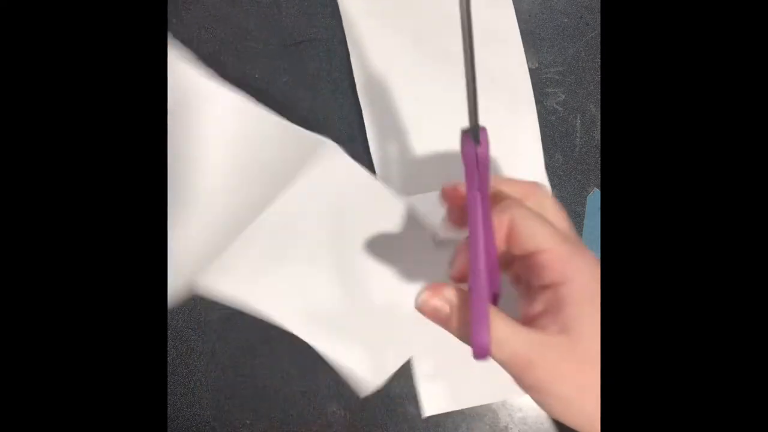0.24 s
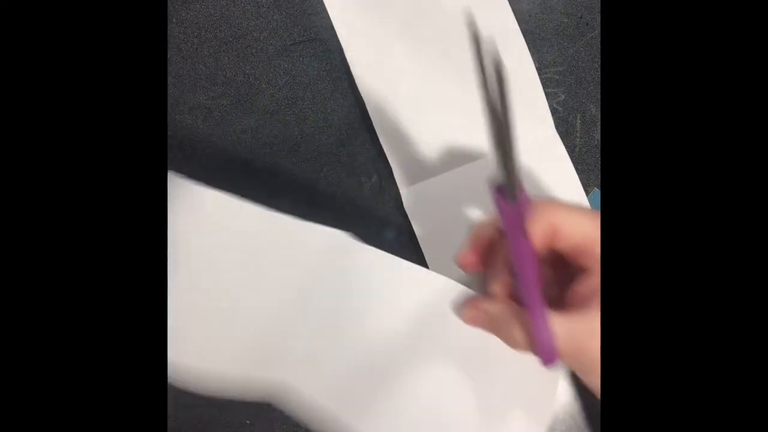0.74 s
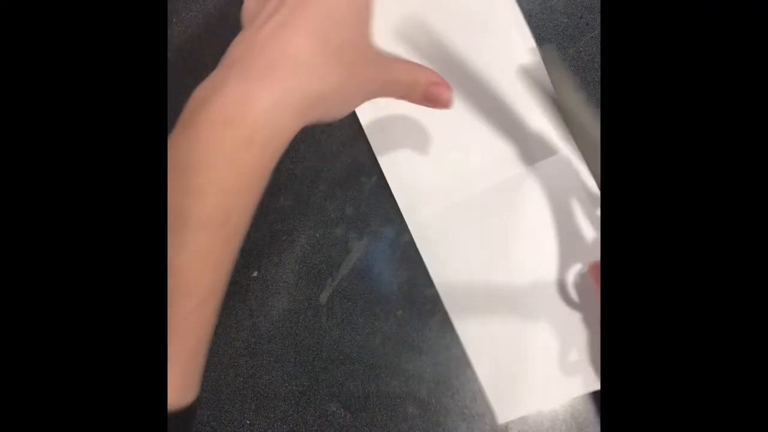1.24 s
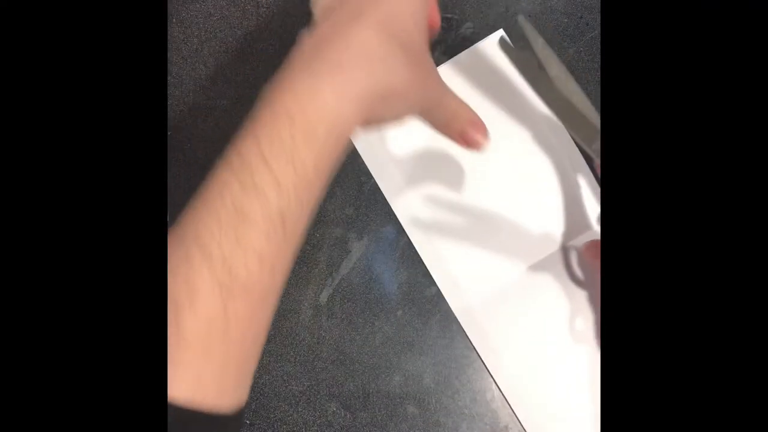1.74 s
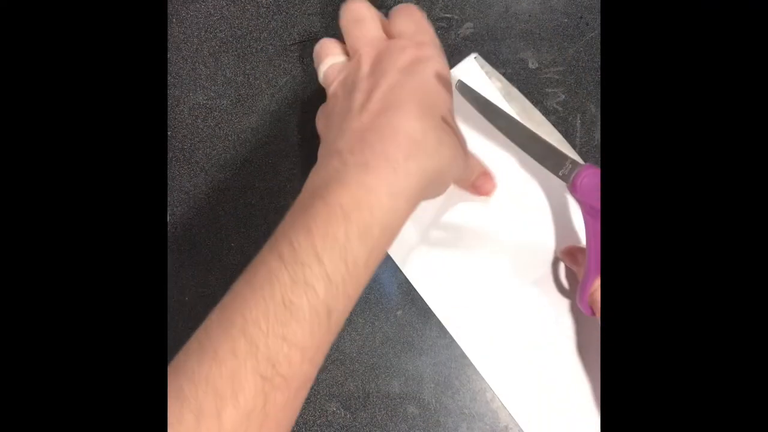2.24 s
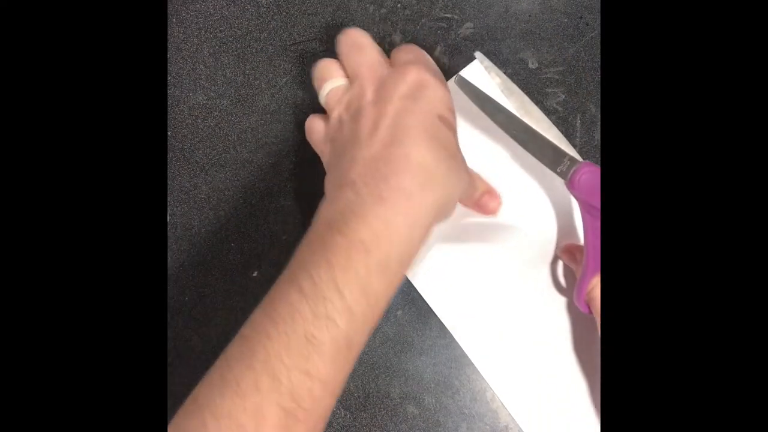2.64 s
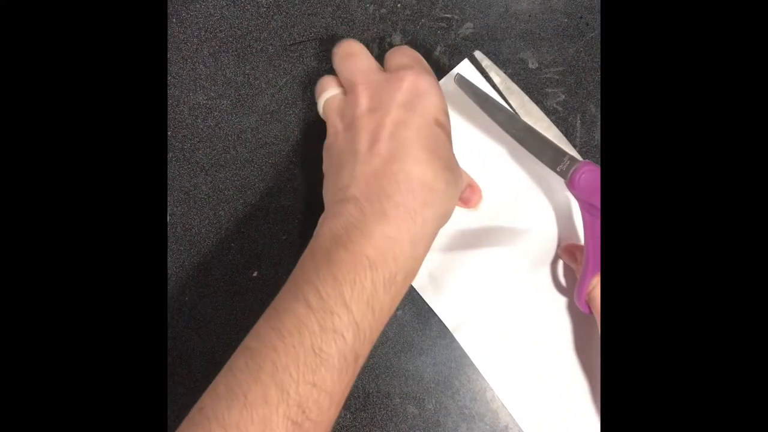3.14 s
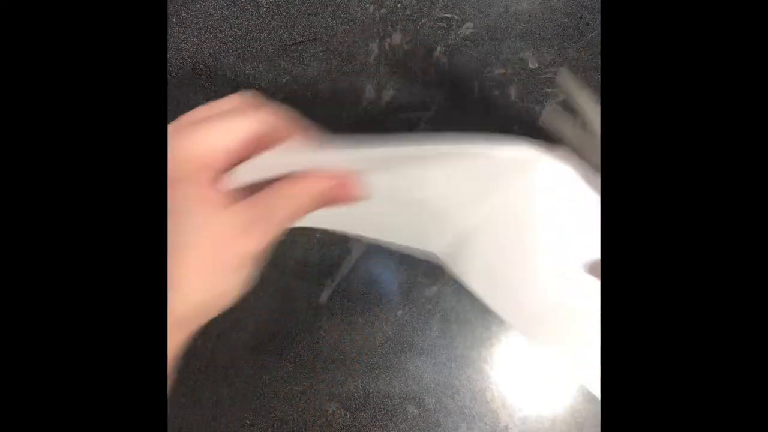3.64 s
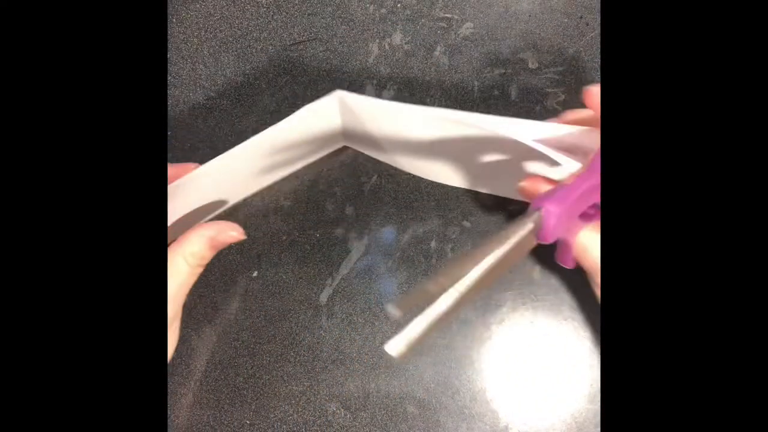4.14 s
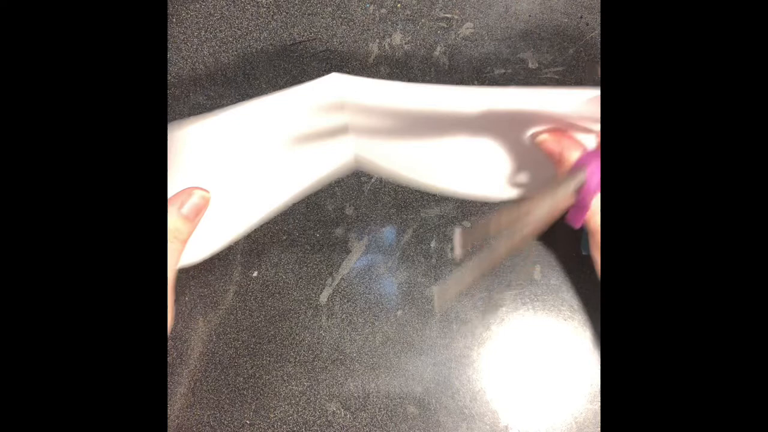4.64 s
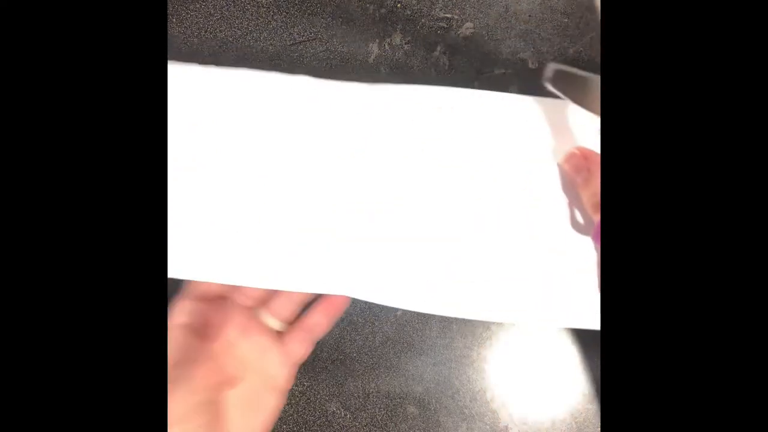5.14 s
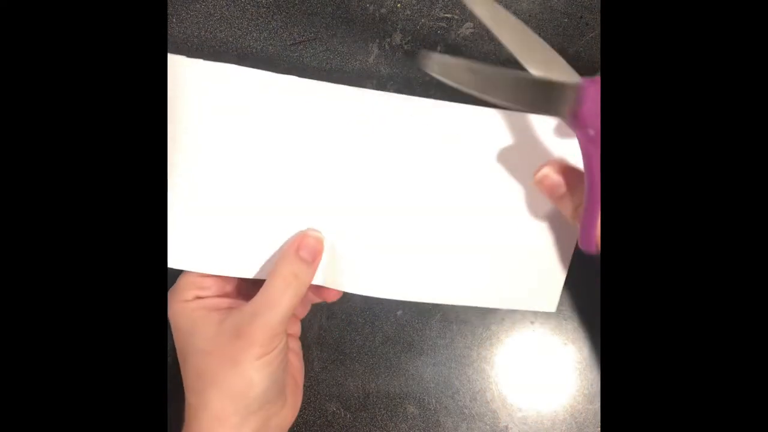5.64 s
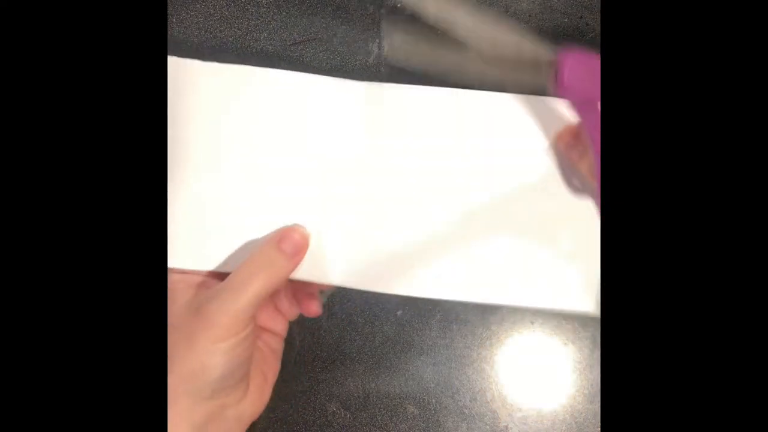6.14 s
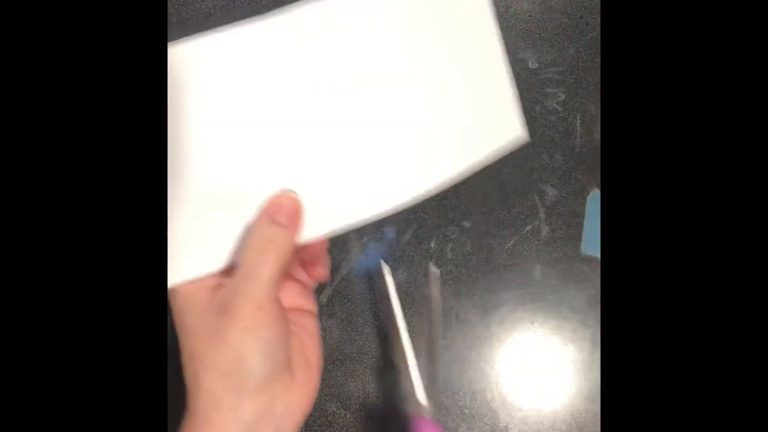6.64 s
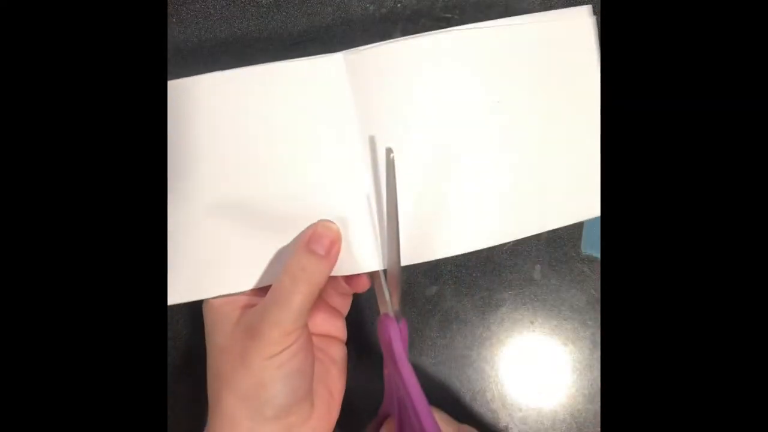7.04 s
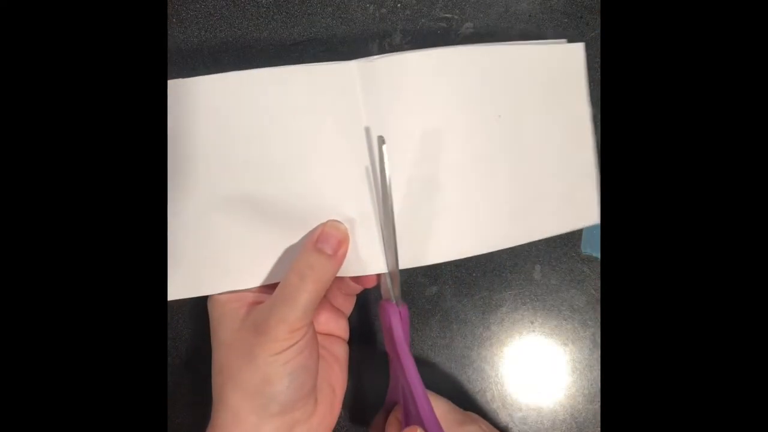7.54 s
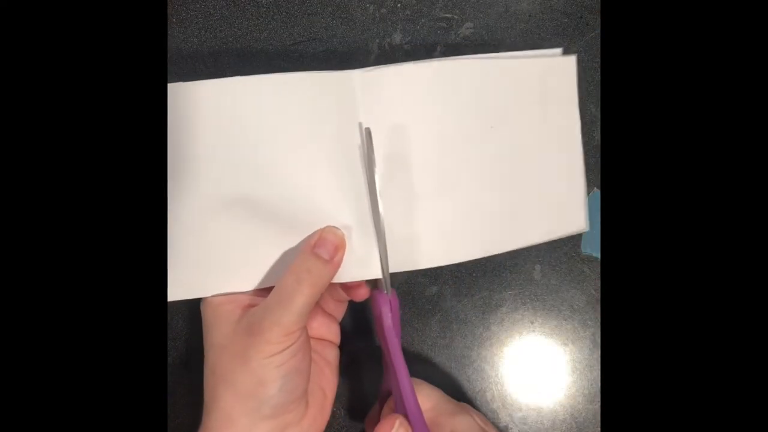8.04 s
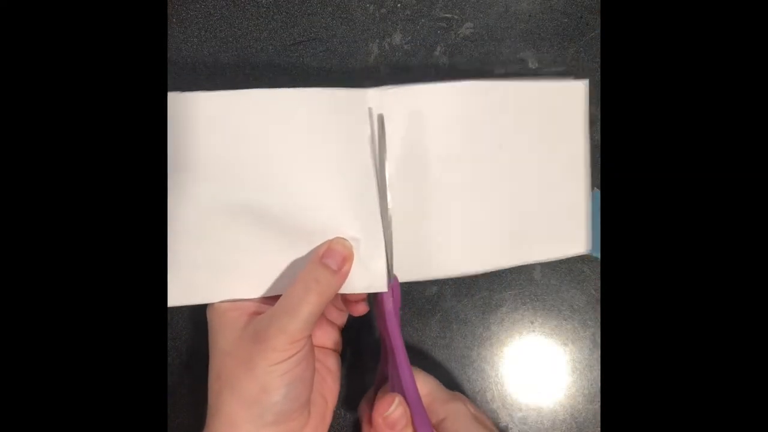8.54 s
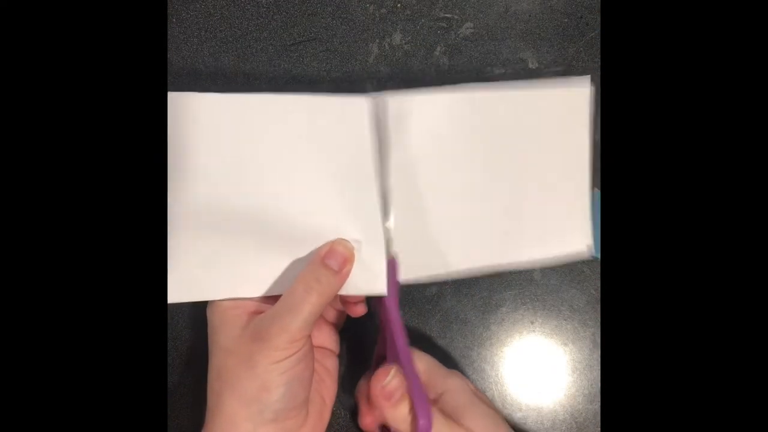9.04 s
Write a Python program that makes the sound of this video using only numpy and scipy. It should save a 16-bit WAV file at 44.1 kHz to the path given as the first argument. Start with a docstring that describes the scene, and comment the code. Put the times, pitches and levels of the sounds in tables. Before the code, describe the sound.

Hands fold a sheet of paper with light snapping creases before scissors snip through it with quick, gritty strokes in a small room.

```python
"""A sheet of paper is turned and folded by hand over a countertop, then cut with short scissor strokes.
Tiny buckles and tearing fibres click into the sheet's resonances, voiced in four bands: crackle, body,
thin edge and low flap. The sheet flops onto the counter and a finger squeaks along its edge.
Underneath, a fan, mains hum and a buzzing whine fill the small room."""
import sys
import numpy as np
from scipy import signal
from scipy.fft import rfft, irfft
from scipy.io import wavfile
from scipy.ndimage import uniform_filter1d

SR = 44100
rng = np.random.default_rng(int(sys.argv[2]) if len(sys.argv) > 2 else 0)


def master(y):
    """Save y as 16-bit WAV."""
    cut = np.clip(np.atleast_2d(y).T, -1, 1)
    pcm = np.round(cut * 32767)  # scale
    wavfile.write(sys.argv[1], SR, pcm.astype(np.int16))


N = 409226
T = np.arange(N) / SR

# tone of the fan's air: frequency_hz, relative_db
FAN_SPECTRUM = [(15, -53), (25, -13.5), (129, -0.5), (193, -13), (227, -10.5), (322, -18), (359, -10.5),
                (433, -23), (702, -14.5), (1490, -27), (1710, -25.5), (3430, -29.5), (5140, -32.5),
                (5730, -34.5), (15500, -44.5)]
# fader ride on the room tone: time_s, level_db, rumble_boost_db
ROOM_TONE_RIDE = [(0, -59.5, -1.5), (4.74, -61.5, -1), (4.79, -62.5, -4), (8.68, -61, -10),
                  (8.73, -59.5, -4.5), (9.28, -59, 1)]
# envelope of the finger squeak: time_s, level_db
SQUEAK_ENVELOPE = [(3.7, -100), (3.725, -60.5), (3.81, -69.5), (3.85, -92)]
# ring of the counter and the air under the sheet: pitch_hz, level_db, t60_s
COUNTER_MODES = [(166.3, 0, .16), (306, -2.5, 0.068), (455, -3, .06)]
# the sheet lands on the counter: start_s, level_db, upper_modes_db
LANDINGS = [(1.180, -46.5, 10), (1.199, -40.5, 0), (1.323, -50.5, 6.5), (1.343, -45, -3), (2.104, -46, 3),
            (2.536, -50, 0)]
# resonances of the loose sheet, by band: pitch_hz, nominal_width_hz, relative_db
LOOSE_MODES = {"crackle": [(1952, 280, 0), (2270, 192, 2.5), (2697, 300, 7.5), (3096, 110, -5)],
               "body": [(686, 138.2, -2.5), (946, 170, 0), (1235, 180, -11.5), (1464, 159, -4.5)],
               "edge": [(3700, 190, 2), (4700, 100, -4), (5240, 1600, -12.5)], "flap": [(196.5, 80, -3.5),
               (319, 72, -1.5), (520, 162, 2)]}
# resonances of the sheet pinched between the blades, same columns
PINCHED_MODES = {"crackle": [(1820, 280, -11), (2220, 150, -3.5), (2477, 140, 0), (2854, 247, -1.5)],
                 "body": [(772, 70, -3.5), (951, 142, 3), (1290, 120, -7), (1472, 77, -1), (1650, 76, -12)],
                 "edge": [(3680, 330, 2.5), (3964, 83, 7), (4670, 770, -6), (5810, 260, -7.5),
                 (6180, 620, -11)], "flap": [(388, 115, 2.5), (507, 25, -2), (652, 145, 1.5)]}
# bending waves bring the low resonances later, by band: delay_ms
BAND_DELAY_MS = {"crackle": 0, "body": 1.207, "edge": 0, "flap": 2.963}
# In the four cue lists below, body_db, edge_db and flap_db are offsets from crackle_db.
# the blades push through the paper: start_s, hold_s, crackle_db, body_db, edge_db, flap_db
BLADE_PUSHES = [(6.822, 0.11, -56, -1, -18, -12.5), (6.95, 0.087, -66, 8.5, -16.5, -6.5),
                (7.085, 0.048, -71, 13, -15, -1), (7.163, 0.06, -62.5, 4, -17.5, -9.5),
                (7.345, .065, -52, 1.5, -15.5, -21.5), (7.425, 0.22, -56.5, 5.5, -15, -11.5),
                (7.77, 0.094, -55, 4, -13, -6), (7.89, 0.13, -55.5, 4, -12, -7),
                (8.122, 0.09, -54, 7, -12, -6), (8.235, .11, -56.5, 5, -9, -5.5),
                (8.432, 0.082, -53, 9.5, -15, -1.5), (8.545, 0.091, -57.5, 8.5, -5.5, -0.5),
                (8.71, .10, -53, 6, -14, -1), (8.83, 0.039, -47.5, 8, -12, 0),
                (8.981, 0.077, -53.5, 7.5, -12.5, -3.5), (9.088, 0.021, -49.5, 5, -8, 2),
                (9.12, 0.036, -58, 6, -10, 4), (9.234, .05, -54, 6.5, -14, 5)]
# the blades catch and slip: start_s, crackle_db, body_db
BLADE_CATCHES = [(6.8243, -42, -4.5), (6.9166, -43, -14), (7.0852, -54.5, 11), (7.3536, -44, -2),
                 (7.379, -37, -6), (7.3915, -40.5, -9), (7.400, -39, -5), (7.4823, -38, -2),
                 (7.5656, -40.5, 8), (7.6384, -38.5, 4.5), (7.6758, -42, -1), (7.7736, -50, 3),
                 (7.9063, -39, -11), (7.9367, -36.5, -6), (7.9796, -38.5, -2), (7.9921, -35.5, -3.5),
                 (8.0186, -33, -1), (8.054, -33, -4.5), (8.1308, -35, 7), (8.1902, -39, 7),
                 (8.2327, -27.5, -7), (8.247, -33.5, 0), (8.262, -35.5, 0), (8.2855, -37, -1),
                 (8.3029, -42, 2), (8.3254, -39, 3), (8.4202, -41, 2), (8.4401, -35.5, 3),
                 (8.4576, -32.5, -8), (8.4835, -44, -3), (8.5284, -32.5, 1.5), (8.5455, -38.5, 5),
                 (8.5593, -29, 3.5), (8.570, -32.5, 3), (8.5888, -43, -3), (8.6062, -30.5, 3),
                 (8.6123, -35, 1), (8.6262, -29, -0.5), (8.715, -38.5, 1), (8.7479, -38, -4),
                 (8.8297, -42, 8), (8.844, -29.5, 2.5), (8.862, -35, 3), (8.8761, -30.5, 1),
                 (8.913, -34, 3.5), (8.9809, -46, -8), (8.9988, -36, -5), (9.0482, -33.5, 7.5),
                 (9.0861, -31.5, 4.5), (9.099, -31.5, 0), (9.114, -35, 1), (9.129, -35, 2),
                 (9.145, -29.5, 0.5), (9.2353, -47.5, 13)]
# the paper rustles in the hands: start_s, hold_s, crackle_db, body_db, edge_db, flap_db
HAND_RUSTLES = [(0.036, 0.057, -46, -9, -12.5, -20), (0.13, 0.023, -69, 10, -19, 12),
                (0.167, 0.087, -44.5, -6.5, -15, -14.5), (0.29, 0.064, -67.5, 3, -13, 3),
                (0.4, 0.022, -64, -10, -16, -3), (0.457, 0.13, -64, 0, -12, 3),
                (0.68, 0.12, -64.5, -7.5, -14, -5), (0.8, 0.049, -67.5, 9.5, -13, 8),
                (0.95, 0.013, -70, -14.5, -23, -8), (1.005, 0.056, -61.5, 0.5, -12, -3),
                (1.075, 0.078, -50, -1.5, -19, -12), (1.24, 0.09, -58.5, -3.5, -15.5, -8),
                (1.35, 0.071, -63, -13, -16, -5.5), (1.476, 0.144, -55.5, -7.5, -19, -4.5),
                (1.79, 0.24, -55.5, -4.5, -15.5, -11), (2.1, 0.02, -60.5, 2, -18, 7),
                (2.255, 0.062, -53, -12, -21, -14), (2.34, 0.097, -54.5, -4, -22, -10),
                (2.53, 0.03, -70, -3, -17, 8.5), (2.59, 0.044, -54, -9, -19.5, -15),
                (2.72, 0.041, -66.5, -10, -13, -14), (2.81, 0.11, -67.5, -10, -11, -5),
                (2.94, 0.076, -54.5, -8.5, -11, -8.5), (3.035, 0.071, -53, -8, -14, -17),
                (3.15, 0.034, -54.5, -12, -13, -15), (3.23, 0.091, -53, -6.5, -14, -13),
                (3.36, 0.03, -53, -11.5, -12, -24), (3.43, 0.075, -57.5, -3, -13, -7.5),
                (3.545, 0.055, -56.5, -1.5, -15, -9.5), (3.63, 0.069, -55.5, -8.5, -15.5, -14),
                (3.985, 0.019, -59, 2, -12, 9), (4.025, 0.024, -57.5, 1, -17, 4.5),
                (4.15, 0.076, -72, -7, -13, -1), (4.28, 0.073, -69, 5, -13, 6.5),
                (4.405, 0.069, -59.5, 4.5, -10, 5.5), (4.52, 0.15, -67, 2.5, -11, 2),
                (4.7, 0.12, -64.5, 5, -8, -2.5), (4.86, 0.15, -72.5, 1, -10, -3.5),
                (5.17, 0.097, -65, -1, -15, -4.5), (5.3, 0.14, -69.5, 5.5, -13, -11),
                (5.5, 0.25, -73.5, 1, -11.5, -8), (5.81, 0.049, -62.5, 4.5, -16, -6),
                (5.9, 0.06, -66.5, -2.5, -16, -19), (6.0, 0.048, -63, 6.5, -17, -7),
                (6.075, 0.026, -61.5, 2.5, -18, -14), (6.21, 0.09, -73, 4.5, -14, -3),
                (6.33, 0.17, -79.5, 0, -10, -6), (6.5, 0.25, -81, -2, -6, -4.5)]
# creases snap: start_s, crackle_db, body_db, edge_db, decay_ms
CREASE_SNAPS = [(0.044, -36, -29, -7, 3.6), (0.169, -37, -27, -19, 4.4), (0.4577, -42.5, -1, -26, 3.9),
                (0.7387, -49.5, 10.5, -26, 15), (0.8029, -45, 2, -11, 7.9), (1.0046, -52, 1.5, -20, 4.4),
                (1.0853, -28, -30, -17, 8.1), (1.1331, -25.5, -6, -34, 7.8), (1.252, -56, 10, -20, 5),
                (1.288, -35, -1, -22, 1.6), (1.359, -42, -17, -12, 3), (1.43, -58, 8, -19, 4),
                (1.475, -8, -17.5, -46, 1.06), (1.7848, -40, -6, -15, 3.4),
                (1.8166, -32.5, -11.5, -26, 4.1), (1.9121, -31.5, -2.5, -30, 3.5),
                (1.9462, -36.5, -8, -16.5, 7), (2.008, -30, -7, -35, 1.4), (2.2596, -35.5, -13.5, -38, 11),
                (2.387, -28.5, 0.5, -37, 1.9), (2.4508, -33.5, -0.5, -38, 4.2), (2.7456, -40, -23, -12, 3),
                (2.7616, -39.5, -6.5, -16, 3.3), (2.8526, -41.5, -27, -16.5, 3.2),
                (3.041, -31.5, -9, -25, 3), (3.0976, -28, -14, -18.5, 4.9), (3.157, -32.5, -29, -17, 3.2),
                (3.1838, -38, -27, -27.5, 3.3), (3.2282, -42, -16, -15, 3), (3.26, -26.5, -17, -27.5, 4.6),
                (3.3084, -21.5, -12, -17, 3.3), (3.5578, -36.5, -7, -29, 8.6), (3.9873, -33.5, 5, -21, 3.5),
                (4.0352, -36, -8, -18, 3.5), (4.7152, -58, 0, -11, 2.6), (4.743, -54, 7, -8, 7),
                (4.7654, -41.5, 7.5, -15, 9.1), (5.1467, -60, 12, -27, 3), (5.2475, -41, -6.5, -25, 4.3),
                (6.022, -42.5, -22, -25, 3), (6.2645, -52, 4, -20, 3.1)]


def undb(db):
    """dB to gain."""
    return 10 ** (np.asarray(db) / 20)


def unit(x):
    """Scaled to rms 1."""
    return x / np.sqrt(np.mean(x ** 2))


def ring(x, hz, width_hz):
    """One resonance, gain 1 at its centre."""
    return signal.lfilter(*signal.iirpeak(hz, hz / width_hz, fs=SR), x)


def drift(rate_hz):
    """A random modulator of rms 1 that glides from value to value."""
    step = int(SR / rate_hz)
    held = np.repeat(rng.standard_normal(N // step + 1), step)
    return unit(uniform_filter1d(held, step)[:N])


def room_tone(hum_hz=120, hum_db=-5, whine_hz=5045, whine_db=-21.5, buzz_hz=58.7):
    """Fan air, wavering mains hum and a pulsing whine; hum and whine levels are relative to the air."""
    log_hz = np.log(np.maximum(np.arange(N // 2 + 1) * SR / N, 1))
    fan_hz, fan_db = np.transpose(FAN_SPECTRUM)
    fan_eq = undb(np.interp(log_hz, np.log(fan_hz), fan_db))
    air = unit(irfft(rfft(rng.standard_normal(N)) * fan_eq, N))
    hum = undb(hum_db + 1.7 * drift(7)) * np.sin(2 * np.pi * hum_hz * T + drift(8.2))
    pulses = np.exp(np.cos(2 * np.pi * buzz_hz * T))
    whine = undb(whine_db) * unit(pulses * np.sin(2 * np.pi * whine_hz * T + 0.45 * drift(60)))
    time_s, level_db, rumble_db = np.transpose(ROOM_TONE_RIDE)
    lows = signal.lfilter(*signal.butter(1, 180, fs=SR), air)
    low_shelf = lows * (undb(np.interp(T, time_s, rumble_db)) - 1)
    return undb(np.interp(T, time_s, level_db)) * (air + low_shelf + hum + whine)


def room_reverb(x, t60_s=0.12, wet_db=-14, predelay_s=0.006):
    """Adds a short diffuse tail that starts with the ceiling's reflection."""
    t = np.arange(SR // 2) / SR
    tail = rng.standard_normal(len(t)) * np.exp(-np.log(1000) * t / t60_s) * (t > predelay_s)
    return x + undb(wet_db) * signal.fftconvolve(x, tail / np.linalg.norm(tail))[:N]


def finger_squeak(pitch_hz=3120):
    """A finger rubs the sheet's edge: a short wavering tone of narrow-band noise."""
    level_db = np.interp(T, *np.transpose(SQUEAK_ENVELOPE), left=-200, right=-200)
    return undb(level_db) * unit(ring(rng.standard_normal(N), pitch_hz, width_hz=25))


def counter_flops(attack_s=0.003):
    """Soft landings of the sheet ring the counter; the upper resonances die first."""
    out, t = np.zeros(N + SR // 4), np.arange(SR // 4) / SR
    lowest, *upper = [undb(db) * np.sin(2 * np.pi * hz * t) * np.exp(-np.log(1000) * t / t60_s)
                      for hz, db, t60_s in COUNTER_MODES]
    for start_s, level_db, upper_db in LANDINGS:
        thud = (lowest + undb(upper_db) * sum(upper)) * (1 - np.exp(-t / attack_s))
        at = int(start_s * SR)
        out[at:at + len(t)] += undb(level_db) * thud
    return out[:N]


def friction_grains(per_s, spread_db, slips_per_s, slip_db, slip_ms):
    """Dense tiny clicks of uneven size; each slip lifts them at once and lets them die down."""
    hits = rng.random(N) < per_s / SR
    slips = (rng.random(N) < slips_per_s / SR) * undb(slip_db) * rng.random(N)
    swell = 1 + signal.lfilter([1], [1, -np.exp(-1000 / (slip_ms * SR))], slips)
    size_db = spread_db * np.minimum(rng.exponential(size=N), 4)
    return unit(hits * swell * undb(size_db) * rng.standard_normal(N))


def rub_envelopes(rubs, rise_db_s, sag_db_s, fall_db_s):
    """One envelope a band: each rub swells, sags while held and dies away; overlaps add in power."""
    power = np.zeros((4, N))
    for start_s, hold_s, crackle_db, *offsets_db in rubs:
        near = slice(max(int((start_s - .1) * SR), 0), int((start_s + hold_s + .4) * SR))
        t = T[near] - start_s
        attack_db = rise_db_s * np.minimum(t, 0)
        sag_db = sag_db_s * (np.clip(t, 0, hold_s) - hold_s / 2)
        release_db = fall_db_s * np.maximum(t - hold_s, 0)
        bands_db = crackle_db + np.array([0, *offsets_db])[:, None]
        power[:, near] += undb(bands_db + attack_db - sag_db - release_db) ** 2
    return np.sqrt(power)


def click_bursts(starts_s, levels_db, decays_ms, sprays, click_ratio, attack_ms=0.67):
    """Each burst is a sharp click, then a spray of smaller ones that swells and dies."""
    out, t_ms = np.zeros(N + 2048), np.arange(2048) / SR * 1000
    for start_s, gain, decay_ms, spray in zip(starts_s, undb(levels_db), decays_ms, sprays):
        burst = spray * (1 - np.exp(-t_ms / attack_ms)) * np.exp(-t_ms / decay_ms)
        burst[0] = click_ratio
        at = int(start_s * SR)
        out[at:at + 2048] += gain * burst / np.hypot(click_ratio, 1)
    return out[:N]


def band_responses(modes, delay_ms, contact_hz=6500):
    """Impulse responses of one band's resonances, unit energy together; a soft contact dulls the top."""
    tick = np.zeros(2048)
    tick[int(delay_ms * SR / 1000)] = 1
    tick = signal.sosfilt(signal.butter(4, contact_hz, fs=SR, output="sos"), tick)
    responses = []
    for k, (hz, width_hz, db) in enumerate(modes):
        stage_hz = 1.78 * width_hz  # two wider stages in series give steep skirts
        responses.append((-1) ** k * undb(db) * ring(ring(tick, hz, stage_hz), hz, stage_hz))
    return np.array(responses) / np.linalg.norm(sum(responses))


def paper(sheet, envelopes, texture, bursts, flap_db, bend_db, click_ratio, flap_tilt_db=0):
    """Friction and bursts ring the sheet; as it bends, each resonance is driven more or less."""
    starts_s, crackle_db, body_db, edge_db, decays_ms = np.transpose(bursts)
    offsets_db = [0, body_db, edge_db, body_db + flap_db]
    shared_grains = friction_grains(**texture)
    sprays = rng.standard_normal((len(bursts), 2048)) / np.sqrt(SR / 1000)
    out = np.zeros(N)
    for band, envelope, offset_db in zip(sheet, envelopes, offsets_db):
        responses = band_responses(sheet[band], BAND_DELAY_MS[band])
        # most grains shake the whole sheet, some only this band
        rub = envelope * unit(shared_grains + 0.48 * friction_grains(**texture))
        clicks = click_bursts(starts_s, crackle_db + offset_db, decays_ms, sprays, click_ratio)
        clicks /= np.abs(responses.sum(axis=0)).max()
        for k, response in enumerate(responses):
            wander_db = bend_db * drift(14)
            drive = rub * undb(wander_db) + clicks * undb(0.406 * wander_db)  # bursts wander less
            tilt_db = flap_tilt_db * (k - 1) if band == "flap" else 0
            out += signal.oaconvolve(drive * undb(tilt_db), response)[:N]
    return out


def scissor_cuts(catch_edge_db=-18, catch_decay_ms=3.8, tilt_db_s=4.5, tilt_even_s=8.14):
    """Blades tear the fibres of the pinched sheet with a gritty crunch, catching and slipping."""
    gritty = dict(per_s=6000, spread_db=1, slips_per_s=100, slip_db=7, slip_ms=3.6)
    pushes = rub_envelopes(BLADE_PUSHES, rise_db_s=5000, sag_db_s=8, fall_db_s=700)
    catches = [(*catch, catch_edge_db, catch_decay_ms) for catch in BLADE_CATCHES]
    # as the slit lengthens, the flapping shifts from its lower to its upper resonance
    slit_tilt_db = tilt_db_s * (T - tilt_even_s)
    return paper(PINCHED_MODES, pushes, gritty, catches, flap_db=-19, bend_db=2.5, click_ratio=1.38,
                 flap_tilt_db=slit_tilt_db)


def hand_folding():
    """Hands rub and buckle the loose sheet: a smooth rustle dotted with snapping creases."""
    smooth = dict(per_s=8000, spread_db=2, slips_per_s=40, slip_db=0, slip_ms=6)
    rustles = rub_envelopes(HAND_RUSTLES, rise_db_s=2201, sag_db_s=17.5, fall_db_s=430)
    return paper(LOOSE_MODES, rustles, smooth, CREASE_SNAPS, flap_db=-11.5, bend_db=3, click_ratio=1.2)


def scene():
    """Mono mix: the paper sounds in the small room, over the room tone."""
    foley = hand_folding() + scissor_cuts() + counter_flops() + finger_squeak()
    return (room_reverb(foley) + room_tone())[None]


def record(dry):
    """A low cut removes the deepest bass and a steep high cut trims the top."""
    low_cut = signal.butter(3, 36, "high", fs=SR, output="sos")
    high_cut = signal.ellip(10, .2, 70, 15450, fs=SR, output="sos")
    return signal.sosfilt(high_cut, signal.sosfilt(low_cut, dry))


dry = scene()
out = record(dry)
master(out)
```